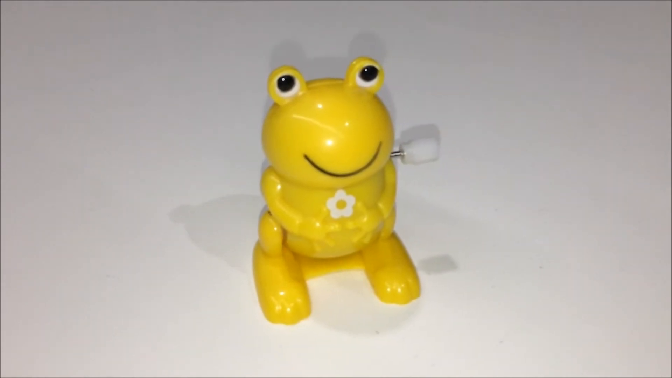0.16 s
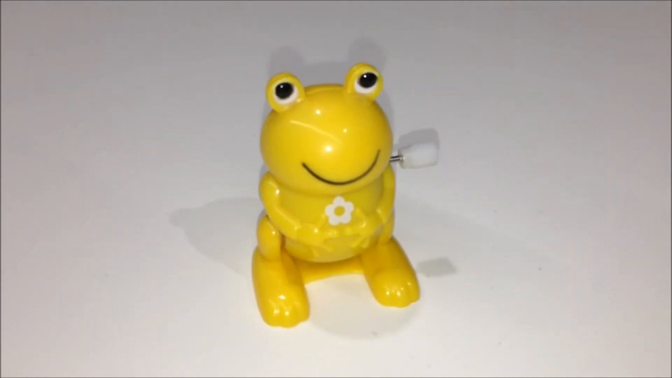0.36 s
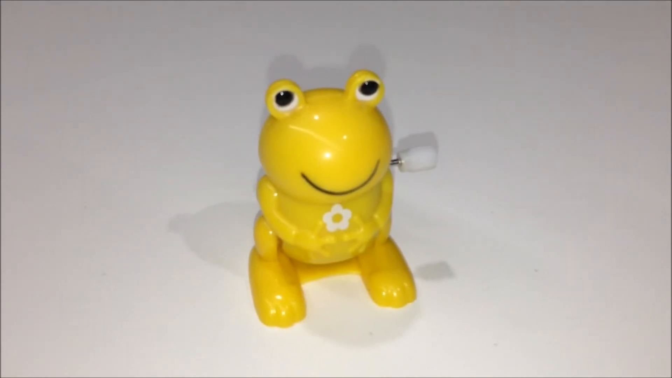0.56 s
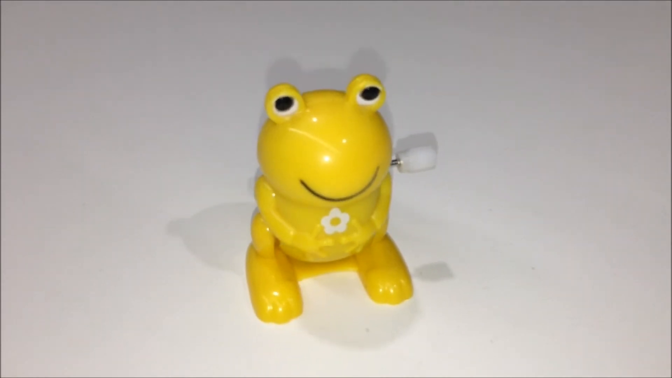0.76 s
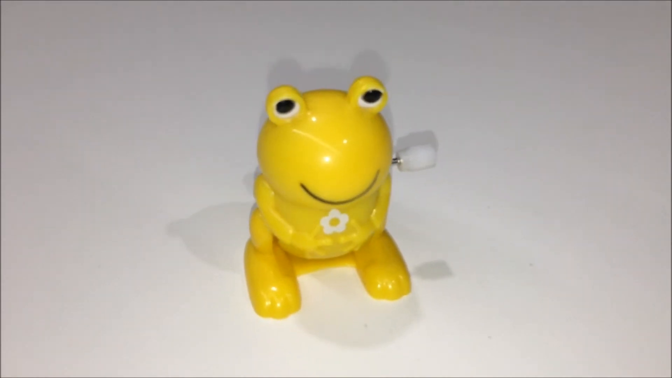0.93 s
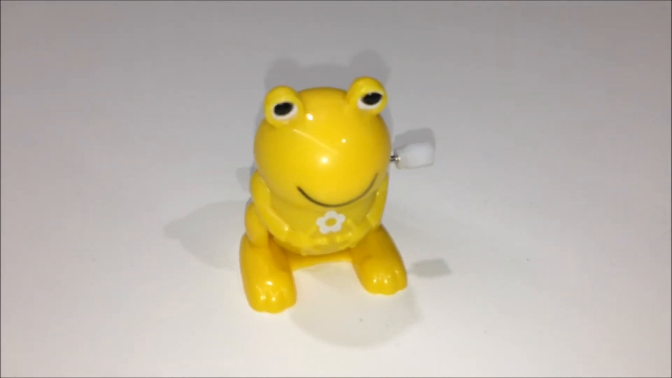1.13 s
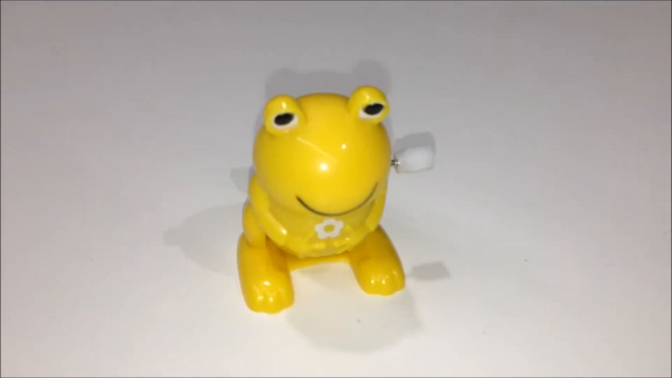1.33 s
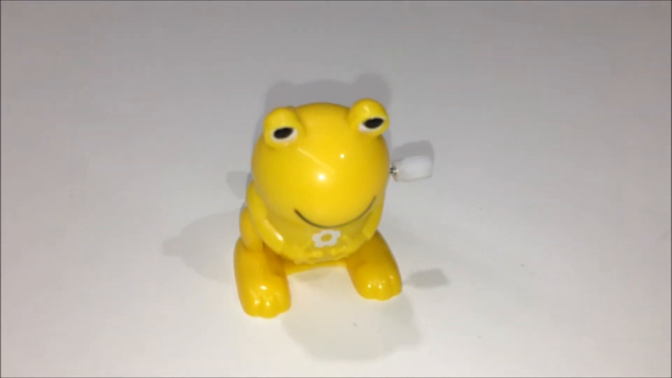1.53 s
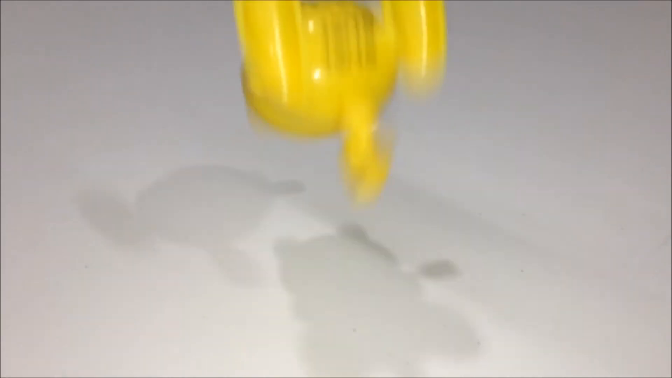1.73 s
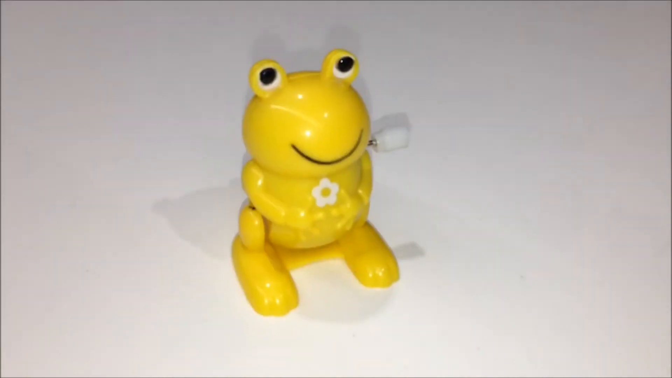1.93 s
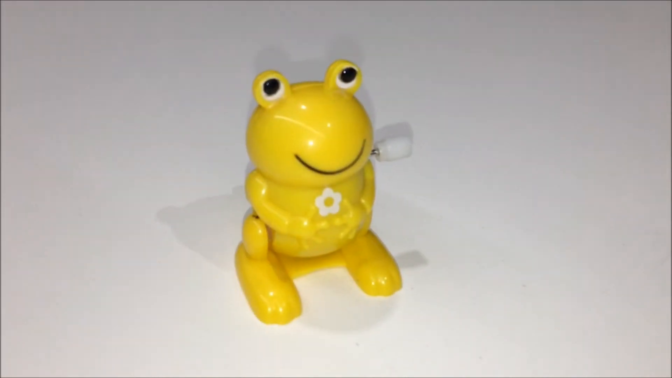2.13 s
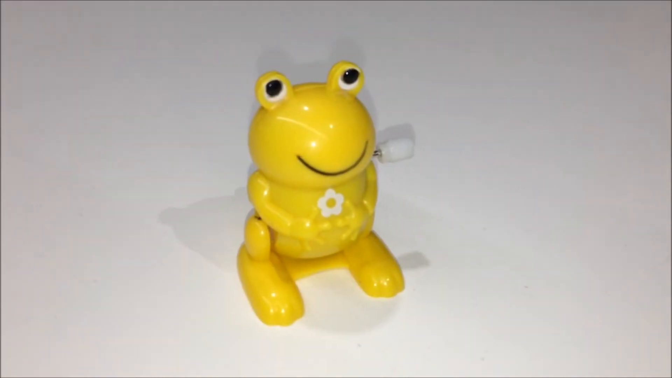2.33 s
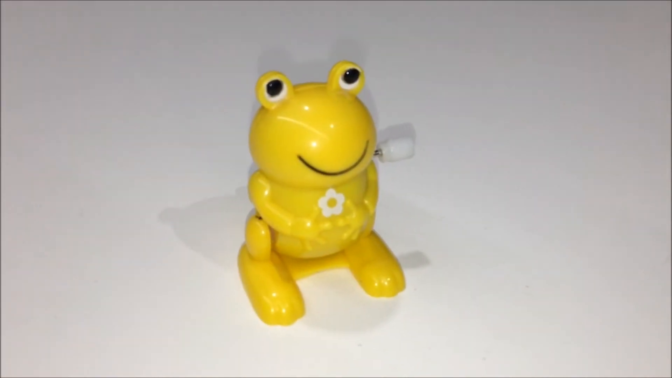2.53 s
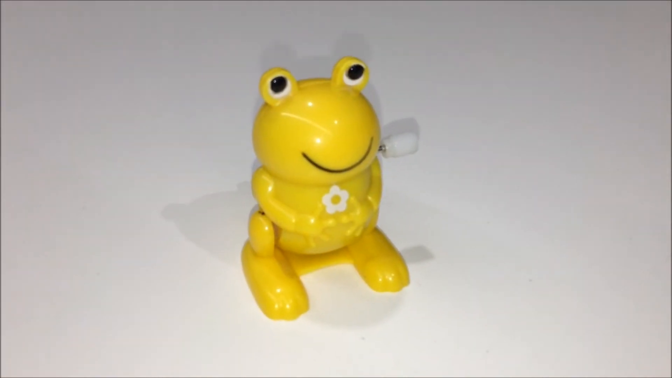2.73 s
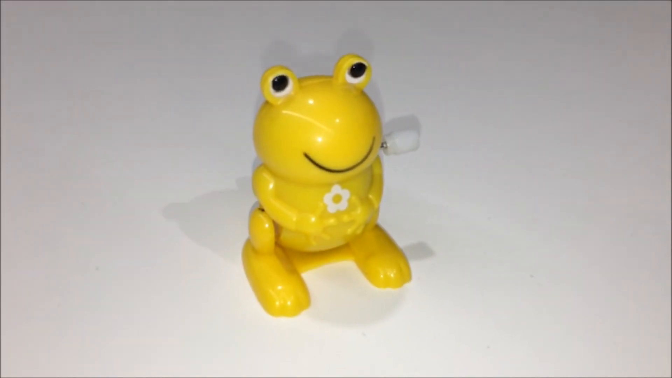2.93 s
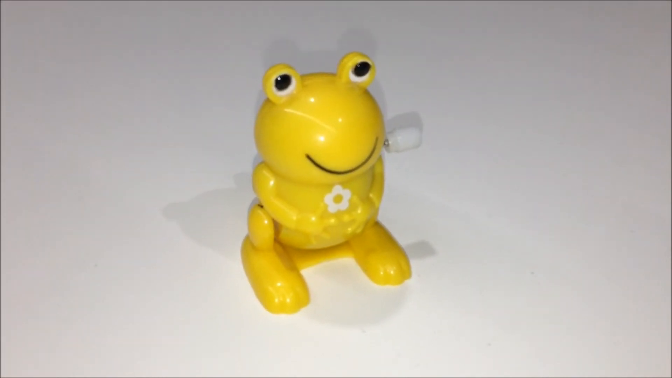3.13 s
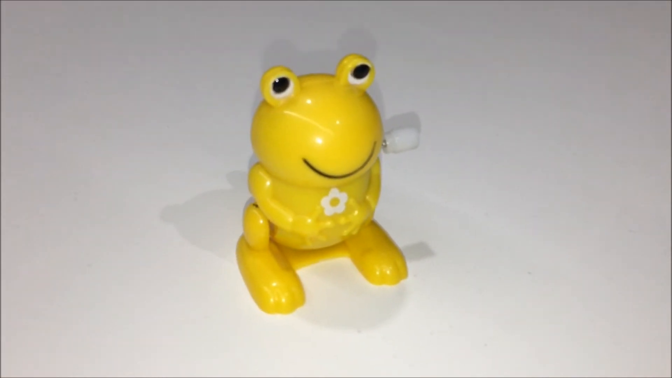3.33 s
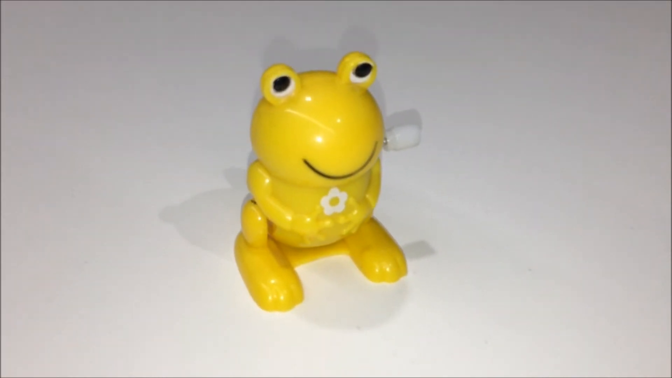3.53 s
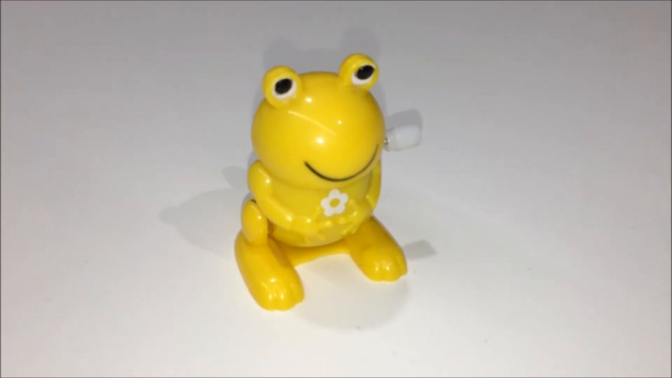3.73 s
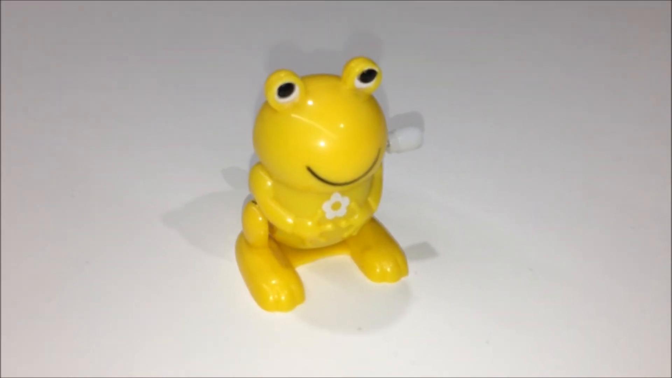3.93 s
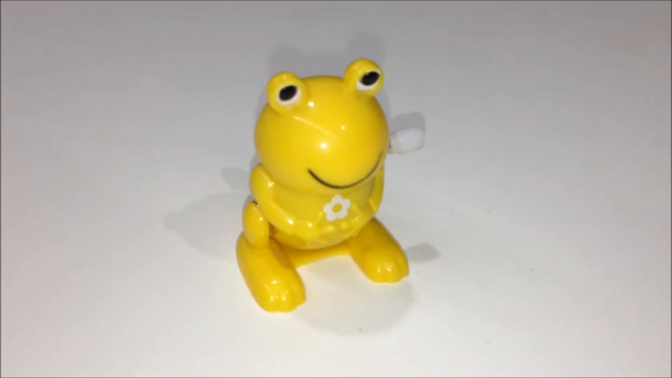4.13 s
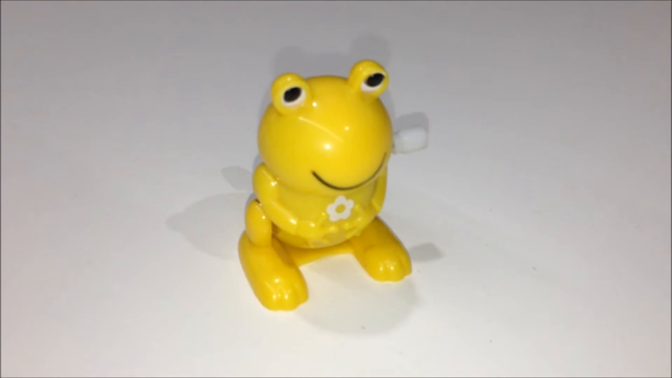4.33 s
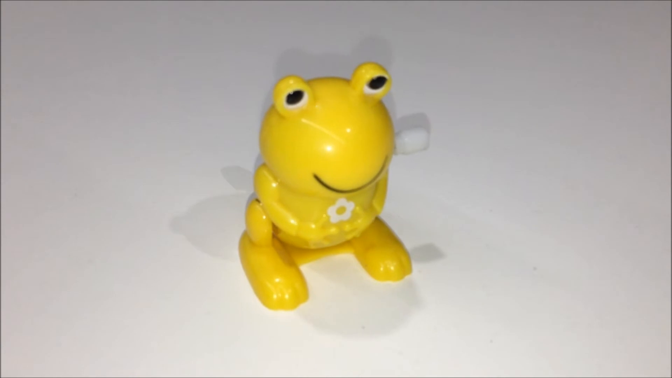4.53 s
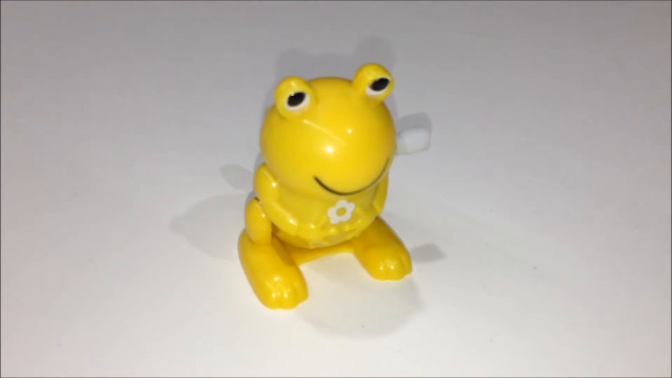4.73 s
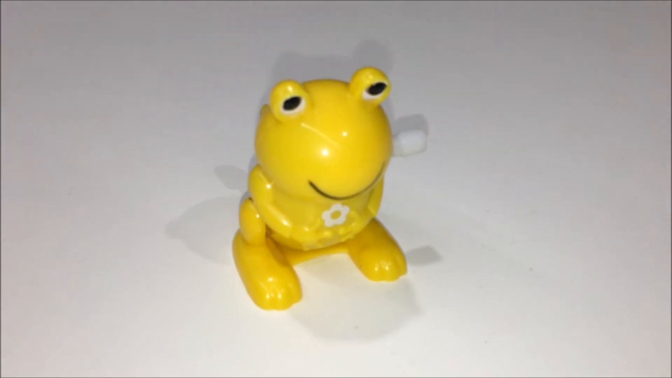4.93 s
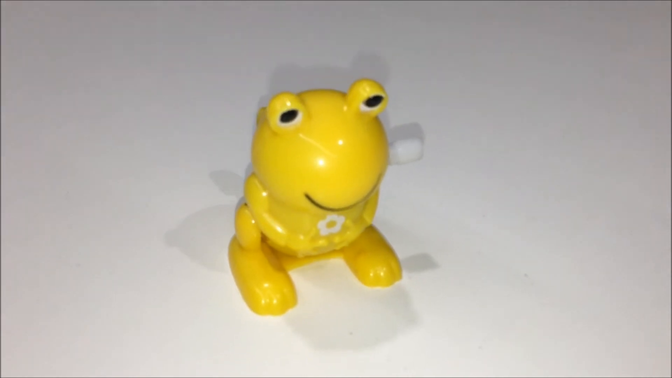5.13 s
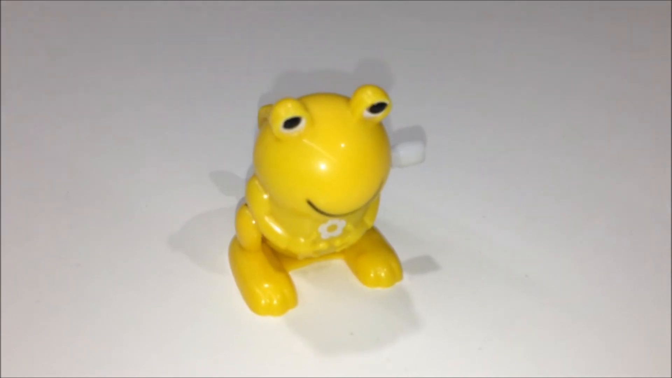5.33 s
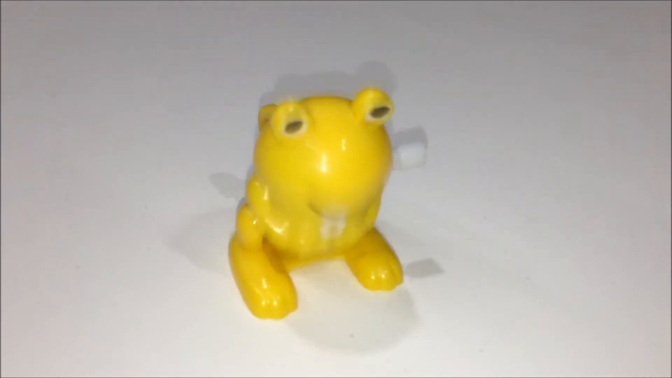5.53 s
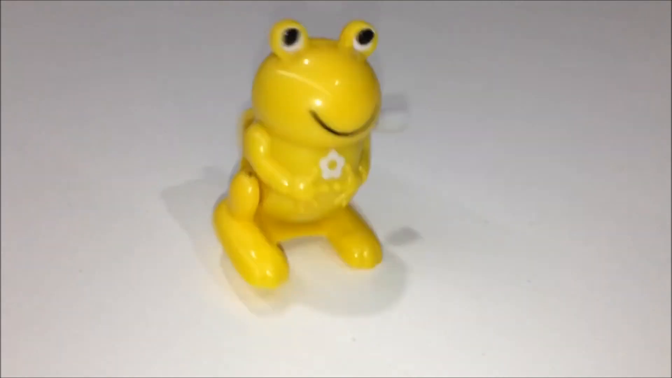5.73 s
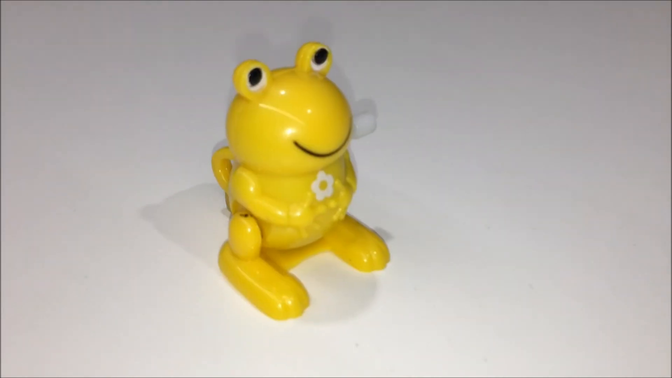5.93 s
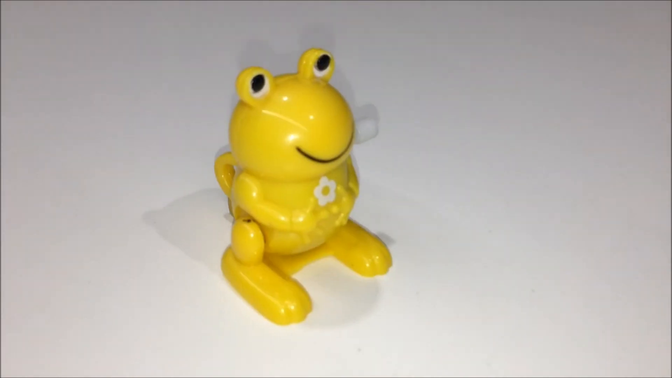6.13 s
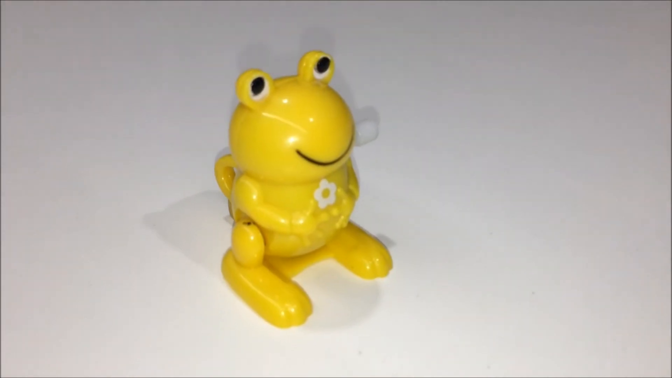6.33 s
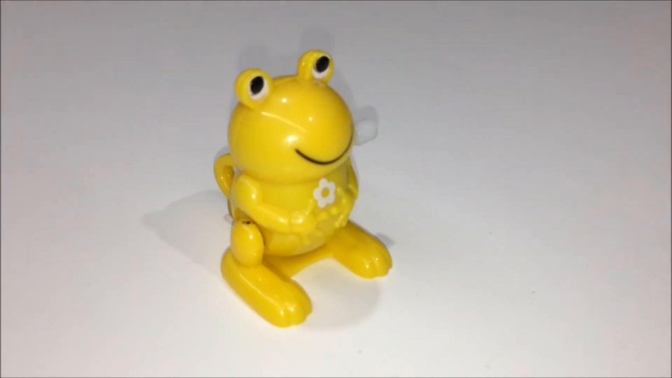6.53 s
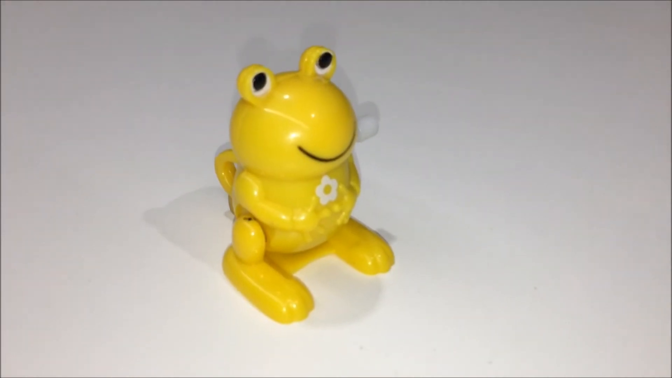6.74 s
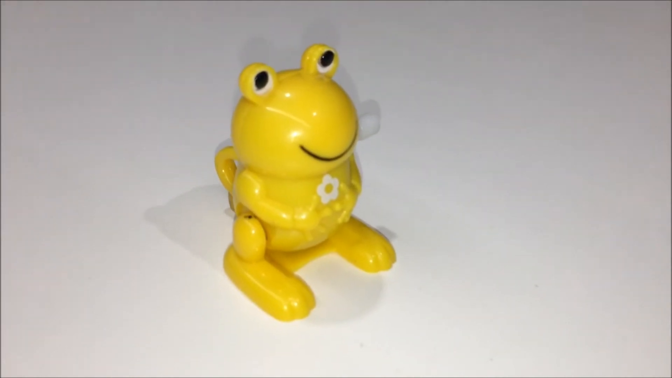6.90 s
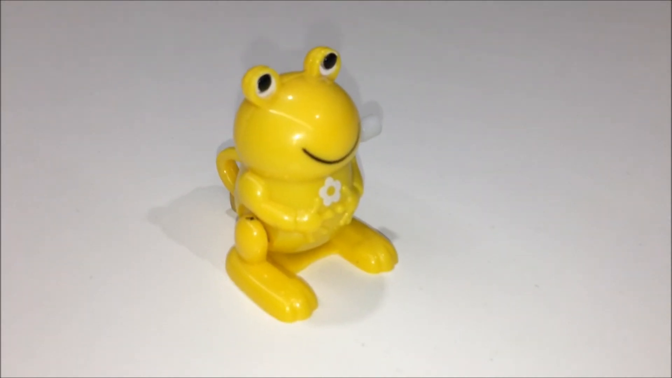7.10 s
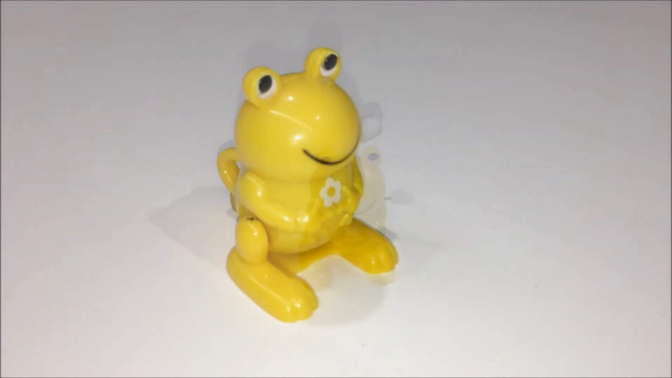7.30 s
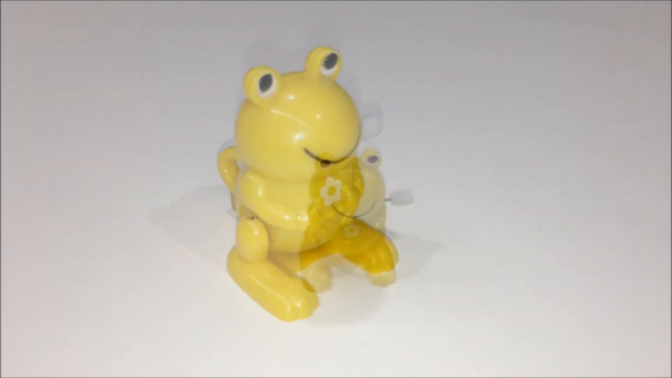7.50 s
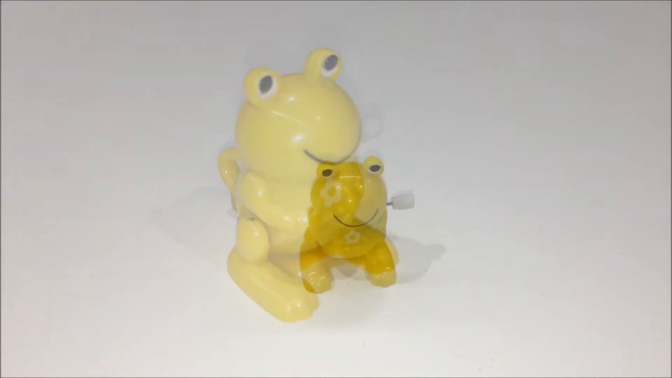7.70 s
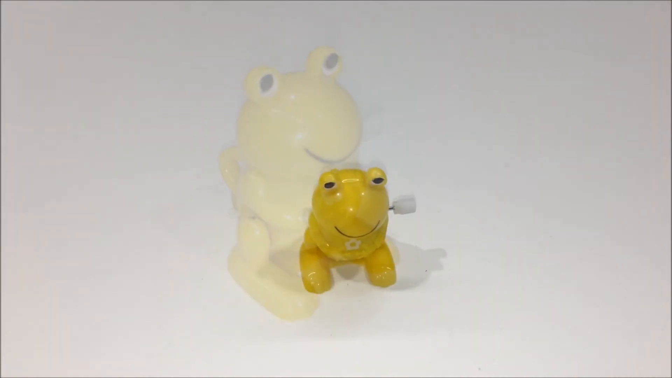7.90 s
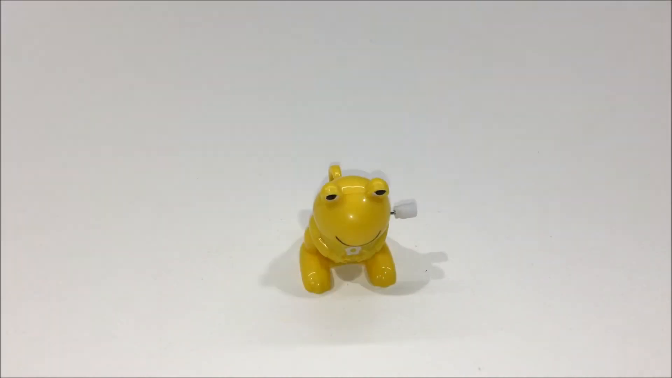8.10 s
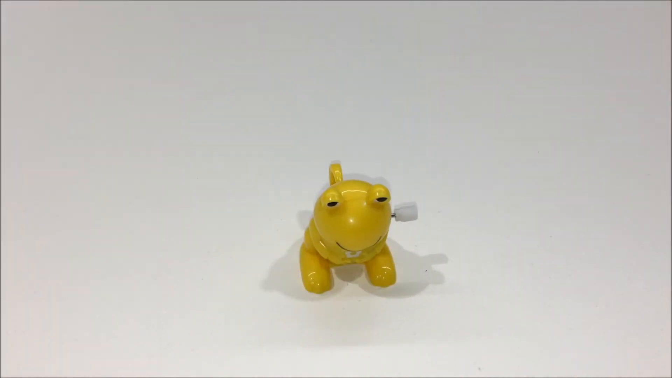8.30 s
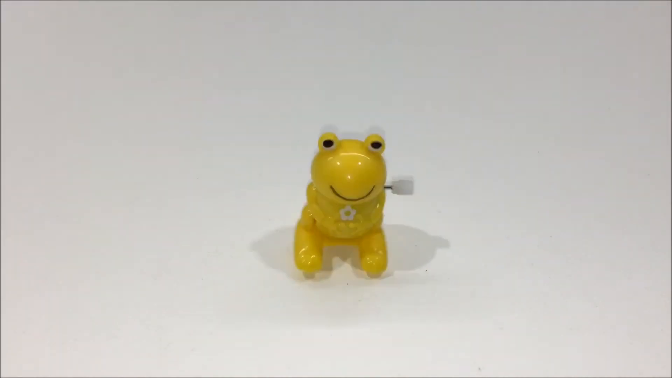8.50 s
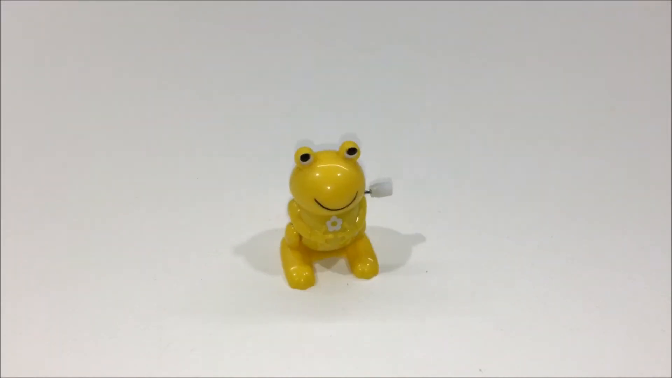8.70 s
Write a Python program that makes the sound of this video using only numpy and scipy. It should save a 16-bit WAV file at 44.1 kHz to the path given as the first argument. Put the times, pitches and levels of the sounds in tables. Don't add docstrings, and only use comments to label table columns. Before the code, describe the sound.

A plastic clockwork toy frog whirrs close to the microphone in a quiet room, hissy and bright. The whirr sags under load, climbs, then a sharp snap and rattling landing follow. It slows almost to separate ticks, speeds up, jumps again, rocks with small ticks and runs down. A freshly wound whirr takes over from farther away and ends with one more jump.

```python
import sys
import numpy as np
from scipy import signal
from scipy.fft import rfft, irfft
from scipy.io import wavfile
from scipy.ndimage import uniform_filter1d

SR = 44100
rng = np.random.default_rng(int(sys.argv[2]) if len(sys.argv) > 2 else 0)


def attenuation_scalar(level_db):
    decades = np.asarray(level_db, float) / 20
    return 10 ** decades


def dump(signal):
    limited = np.clip(np.atleast_2d(signal).T, -1, 1)
    pcm = np.round(limited * 32767).astype(np.int16)
    wavfile.write(sys.argv[1], SR, pcm)


N = 386316

SCENE_CHANGE_S, TURN_ASIDE_S = 7.2035, 5.87
# time in seconds, teeth per second in Hz, whirr level in dB.
GEARS = [(0, 779, -28), (1.0, 412.4, -35), (1.4, 489.7, -32.5), (1.85, 749, -29.5), (2.65, 691.4, -29.5),
         (3.3, 278, -38), (3.75, 180.7, -45), (4.1, 130, -50.5), (4.19, 124.5, -54.5), (4.8, 175, -49.5),
         (4.95, 224.5, -42.5), (5.7, 643, -30.5), (6.65, 500.6, -31.5), (7.203, 179.3, -46.5),
         (7.204, 569, -30), (7.5, 558.4, -28.5), (8, 429.6, -27), (8.5, 562, -29.5)]
# take-off in seconds, landing in seconds.
JUMPS = [
    (1.855, 2.002),
    (5.721, 5.868),
    (8.495, 8.64),
]
# touch in seconds, seat in seconds, scrape in dB over the whirr, load (0-1) on seating,
# load (0-1) at release.
CAM = [
    (.23, .51, -7, .9, .7),
    (2.7, 3, -7, .42, .55),
    (6.68, 7.2, -7, .3, .3),
    (7.55, 7.72, -12, .9, .94),
]
WHIRR_CAM_DB = (0, -3, -5.5, 0.5)
BELLY_CAM_DB = (-11.5, -8, 1, -8.5)
# seconds after take-off, whirr change in dB, belly change in dB.
JOLT = [
    (-.06, -0.5, 0.5),
    (-.015, 1, 0),
    (.022, -1.5, 0),
    (.07, -1.5, 0),
    (.122, 0.5, -2.5),
    (.177, -5, 4),
    (.22, -2, 0),
    (.35, -0.5, -0.5),
]
SHELL_HZ = [1250, 1900, 2550, 3270, 3500, 3780, 4170, 4330, 5550, 6600, 7150, 8000, 8950, 9900, 11000,
            12200, 13300, 14400, 15200, 15620]
SHELL_WIDTH_HZ = [583, 460, 626, 443, 323, 407, 410, 348, 650, 650, 600, 760, 790, 600, 900, 910, 900, 600,
                  600, 400]
# level in dB running free, level in dB loaded, then changes in dB
SHELL_DB = [(-16, -21, -11, -0.5, -3, 4), (-8.5, -11.5, -3.5, 1.5, -4, -6.5),
            (-21, -17.5, -2, 0.5, -1.5, 3), (-5, -1.5, -3.5, 4.5, -8.5, 3), (-21, -14, 12, 4, 7, -14),
            (-12, -5.5, -27, 4, 6, -6), (-2, 0, -8, 1, -0.5, -5.5), (0, -13, 9.5, 2.5, 1, 4),
            (-9, -14, -8, 2.5, -3, 2), (-7, -8, -3.5, 1.5, 1, -4.5), (-6.5, -4, -1.5, -1, 3, -3.5),
            (-2, -9.5, -2.5, -3, -2.5, -3), (-2.5, -5, -2, 1, -0.5, 2.5), (-7.5, -10.5, -12, -6, 1, 2),
            (-8, -11.5, 1, 3.5, 1, 2), (-6, -8, -1, -0.5, -1.5, 1.5), (-3, -10, 0.5, -1, 0, -3),
            (-15, -12.5, -3, 4, -3, 7.5), (-4.5, -27, 7, 3, -7, 17), (-32, -23, -5, 4, -3, 7)]
TAKE_OFFS = { "latch": (-6.5, -38, [(1.8542, -10, 3, 10600), (5.7128, -17, 1.1, 4900),
             (5.7207, -10, 2.55, 8400), (8.4933, -15, 3.6, 7500)]),
             "spring": (-18, -47, [(1.8556, -8, 4.2, 9740), (1.861, -17, 1.5, 12000),
             (5.7232, -7, 5.2, 12600), (8.4967, -8, 4, 9700)])}
LANDINGS = { "toe": (-32, -21, [(1.992, -24, 2.5, 8440), (5.857, -20, 2.5, 7200)]),
            "feet": (-2, -20, [(2.0017, -6.5, 2.5, 11700), (5.868, -6, 2.2, 8860), (8.639, -7, 5, 11500)]),
            "shell": (-10, -34, [(2.0041, -3.5, 4.9, 8600), (5.8706, -1.5, 6.2, 8400),
            (8.6447, 2.5, 2.1, 8500)]), "rock": (0, -16, [(1.8455, -29, 2.3, 3000), (5.915, -24, 1.8, 8900),
            (5.9374, -21, 1.8, 3830), (8.6492, -30, 6, 2400)]), "tick": (-14, -26, [(2.0685, -22, .5, 8000),
            (2.0732, -14, 1.5, 6500), (2.0958, -18, 1.5, 6500), (5.991, -21, .97, 6000),
            (8.7231, -16, .68, 8540), (8.758, -32, 2.2, 7000)]),
            "flick": (-17, -35, [(5.9615, -11, .5, 7600)])}
# centre in Hz, width in Hz, level in dB.
HOLLOW = [(644, 340, 4), (1320, 620, 5), (1775, 680, 8), (3350, 1700, -1)]
# pitch in Hz, level in dB, time to fade by 60 dB in seconds.
TABLE_NEAR = [(69.5, -2, 0.05), (174.7, 2.5, 0.14), (275.7, -0.5, 0.2), (357.4, -3, 0.22), (420, -10, 0.22),
              (230, -16, 0.26), (565, -4, 0.18), (823, -21.5, 0.21)]
# pitch in Hz, level in dB, time to fade by 60 dB in seconds.
TABLE_FAR = [(187, -2, 0.064), (278, -1.5, 0.11), (422, -6.5, 0.18), (580, -13, 0.15), (659, -8.5, 0.13),
             (334, -14, 0.23), (927, -4, 0.052)]
# frequency in Hz, level in dB per Hz.
ROOM_AIR = [(20, -17.5), (60, -13), (110, -10), (150, -6), (195, -0.5), (260, -7), (450, -17), (550, -15),
            (760, -18), (1600, -19), (2300, -32), (6000, -33), (16000, -80)]
# time in seconds, level in dB.
RUMBLE = [
    (0, -67.5),
    (7.2, -77),
    (7.5, -54.5),
    (7.9, -51),
    (8.2, -61),
    (8.76, -54.5),
]


def level(x, db):
    return x * attenuation_scalar(db) / np.sqrt(np.mean(x ** 2))


def ring(x, hz, width):
    return signal.lfilter(*signal.iirpeak(hz, hz / width, SR), x)


def ring_twice(x, hz, width):
    return ring(ring(x, hz, width), hz, width)


def fade(x, seconds):
    return signal.lfilter([1], [1, -np.exp(-1 / (seconds * SR))], x)


def decay_60(t, t60):
    return np.exp(-np.log(1000) * t / t60)


def walk(rate):
    hold = int(SR / rate)
    steps = np.repeat(rng.standard_normal(N // hold + 1), hold)
    return 0.75 * uniform_filter1d(steps, hold)[:N]


def curve(rows):
    s, *columns = np.transpose(rows)
    return [np.interp(np.arange(N) / SR, s, c) for c in columns]


def gears():
    t = np.arange(N) / SR
    starts_to_stall_hz, nearly_stands_hz = 295, 130
    stall = np.clip((starts_to_stall_hz - speed()) / (starts_to_stall_hz - nearly_stands_hz), 0, 1)
    far = t >= SCENE_CHANGE_S
    aside = (t > TURN_ASIDE_S) & ~far
    load, whirr_db, belly_db, rub_db = cam(stall, far)
    blow, chatter = teeth(stall)
    clean = .15 + .6 * stall

    highpass = signal.butter(2, 3000, "high", fs=SR, output="sos")
    between = signal.sosfilt(highpass, chatter * rng.standard_normal(N))
    fill = attenuation_scalar(-21 - 4 * load + 4 * far)

    sound, power = [fill * between, 0], [fill ** 2 * SR / 3, 0]
    for k, (hz, width, changes) in enumerate(zip(SHELL_HZ, SHELL_WIDTH_HZ, SHELL_DB)):
        free_db, loaded_db, stall_db, aside_db, far_db, far_load_db = changes
        gain_db = free_db + load * (loaded_db - free_db) + stall * stall_db
        gain = attenuation_scalar(gain_db + aside * aside_db + far * (far_db + load * far_load_db))
        is_belly = int(2900 < hz < 4600)
        share = clean * (.4 + .6 * is_belly)
        push = (-1) ** k * np.sqrt(share) * blow
        push = push + np.sqrt(1 - share) * chatter * rng.standard_normal(N)
        waver = attenuation_scalar(1.4 * walk(25) + 1.04 * walk(2.545))
        sound[is_belly] = sound[is_belly] + gain * waver * ring_twice(push, hz, width)
        power[is_belly] = power[is_belly] + gain ** 2 * width * np.pi / 4
    shell, belly = (s / np.sqrt(p / (SR / 2)) for s, p in zip(sound, power))

    rub = ring_twice(chatter * rng.standard_normal(N), 5280, 650)
    return (shell + belly * attenuation_scalar(belly_db) + level(rub, 0) * attenuation_scalar(rub_db)) * attenuation_scalar(whirr_db)


def speed():
    s, hz, _ = np.transpose(GEARS)
    return np.exp(np.interp(np.arange(N) / SR, s, np.log(hz)))


def teeth(stall, chatter_s=0.0017, grit_db=2.0):
    jitter, scatter_db, odd_db = .06, 1.7, 1.2
    slide, settle = .7, .88
    turn = np.cumsum(speed()) / SR
    k = np.arange(1, int(turn[-1]))
    early_late, hard_soft = rng.standard_normal((2, len(k)))
    at = np.interp(k + jitter * early_late, turn, np.arange(N)).astype(int)
    hits = np.zeros(N)
    np.add.at(hits, at, attenuation_scalar(scatter_db * hard_soft + odd_db * (-1.) ** k))
    hits = hits * attenuation_scalar(1.0 * walk(45) + .5 * walk(8))

    def even_out(x):
        return x / np.sqrt(uniform_filter1d(x ** 2, SR // 8))

    blow, chatter = even_out(hits), even_out(fade(hits, chatter_s))
    chatter = chatter + slide * (1 - settle * stall)
    return blow, level(chatter * attenuation_scalar(grit_db * rng.exponential(size=N)), 0)


def cam(stall, far):
    ease_s, scrape_load, let_go_curve = 0.034, .35, 2.17
    idle_rub_db, seated_rub_db, scrape_rise_db = -19, -14, 8
    belly_stall_db, belly_far_db = 3, -8
    t, turn = np.arange(N) / SR, np.cumsum(speed())
    load, whirr_db = 0, curve(GEARS)[1] + WHIRR_CAM_DB[0]
    belly_db, rub_db = BELLY_CAM_DB[0], idle_rub_db

    def ramp(s):
        return np.clip((t - s) / ease_s, 0, 1)

    for touch, seat, scrape_db, load_seat, load_end in CAM:
        endings = [up for up, _ in JUMPS] + [SCENE_CHANGE_S]
        release = min(s for s in endings if s > touch)
        seated = ramp(seat) * (t < release)
        scraping = ramp(touch) * (t < release) - seated
        first, last = turn[int(min(seat, release - ease_s) * SR)], turn[int(release * SR)]
        wound = np.clip((turn - first) / (last - first), 0, 1)
        easing = wound ** let_go_curve

        def stage(db):
            return scraping * (db[1] - db[0]) + seated * (db[2] + easing * (db[3] - db[2]) - db[0])

        seated_load = np.interp(wound, [0, .5, 1], [load_seat, 1, load_end])
        load = load + scraping * scrape_load + seated * seated_load
        whirr_db = whirr_db + stage(WHIRR_CAM_DB)
        belly_db = belly_db + stage(BELLY_CAM_DB) + seated * far * (1 - easing) * belly_far_db
        rising_db = scrape_db + scrape_rise_db * ((t - touch) / (seat - touch) - .5)
        rub_db = rub_db + scraping * (rising_db - idle_rub_db) + seated * (seated_rub_db - idle_rub_db)

    after, jolt_db, jolt_belly_db = np.transpose(JOLT)
    for up, _ in JUMPS:
        whirr_db = whirr_db + np.interp(t - up, after, jolt_db, 0, 0)
        belly_db = belly_db + np.interp(t - up, after, jolt_belly_db, 0, 0)
    return np.clip(load, 0, 1), whirr_db, belly_db + belly_stall_db * stall, rub_db


def flip(whirr, height_m=.06, mirror=.35):
    t, height = np.arange(N) / SR, 0
    for up, down in JUMPS:
        arc = 1 - (2 * (t - up) / (down - up) - 1) ** 2
        height = height + height_m * np.clip(arc, 0, 1)
    echo = np.interp(t - 2 * height / 343, t, whirr)
    return np.where(height > 0, (whirr + mirror * echo) / np.sqrt(1 + mirror ** 2), whirr)


def knocks(grain_db=2.5, tail_s=0.0039, tail=0.28):
    far_hollow_db = -7
    out, length = np.zeros(N + SR), SR // 2
    t = np.arange(2048) / SR
    boards = table(TABLE_NEAR, length), table(TABLE_FAR, length)
    for hollow_db, thud_db, rows in [*TAKE_OFFS.values(), *LANDINGS.values()]:
        for s, db, ms, hz in rows:
            far = int(s > SCENE_CHANGE_S)
            grain = rng.standard_normal(len(t)) * attenuation_scalar(grain_db * rng.exponential(size=len(t)))
            dying = tail * np.exp(-(t - ms / 1000).clip(0) / tail_s)
            clack = grain * np.where(t < ms / 1000, 1, dying)
            clack = clack / np.max(np.abs(clack))
            centre = min(hz, 15000)
            bright = ring(clack, centre, 0.46 * hz) + 1.2 * ring(clack, centre, 0.05 * hz)
            bright = bright / np.max(np.abs(bright))
            hollow = sum(attenuation_scalar(g) * ring(clack, f, w) for f, w, g in HOLLOW)
            hollow = hollow / np.max(np.abs(hollow))
            i = int(s * SR)
            out[i:i + len(t)] += attenuation_scalar(db) * (bright + attenuation_scalar(hollow_db + far_hollow_db * far) * hollow)
            out[i:i + length] += attenuation_scalar(db + thud_db) * boards[far]
    return out[:N]


def table(modes, length, rise_s=0.0025):
    t = np.arange(length) / SR
    hum = np.zeros(length)
    for k, (hz, db, t60) in enumerate(modes):
        hum += (-1) ** k * attenuation_scalar(db) * np.sin(2 * np.pi * hz * t) * decay_60(t, t60)
    highpass = signal.butter(2, 35, "high", fs=SR, output="sos")
    return signal.sosfilt(highpass, hum * (1 - np.exp(-t / rise_s)))


def walls(toy):
    t = np.arange(SR // 4) / SR
    echoes = rng.standard_normal(len(t)) * decay_60(t, .3) * (t > .004)
    return signal.fftconvolve(toy, level(echoes, -56))[:N]


def room():
    hz, db = np.transpose(ROOM_AIR)
    f = np.arange(N // 2 + 1) * SR / N
    colour = attenuation_scalar(np.interp(np.log(f + 1), np.log(hz), db))
    air = irfft(rfft(rng.standard_normal(N)) * colour, N)
    rumble = level(ring_twice(rng.standard_normal(N), 117, 66), 0) * attenuation_scalar(curve(RUMBLE)[0])
    return level(air * attenuation_scalar(1.0 * walk(2.184)), -51) + rumble


def scene():
    toy = flip(gears()) + knocks()
    mono = toy + walls(toy) + room()
    return np.array([mono, mono])


def top_cut(x):
    return signal.sosfilt(signal.butter(12, 16820, fs=SR, output="sos"), x)


def record(dry):
    lowpass = signal.ellip(10, .2, 75, 15740, fs=SR, output="sos")
    mix = np.clip(signal.sosfilt(lowpass, dry), -1, 1)
    return top_cut(mix)


dry = scene()
out = record(dry)
dump(out)
```